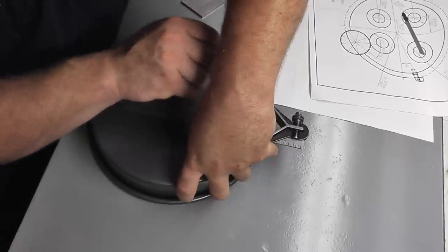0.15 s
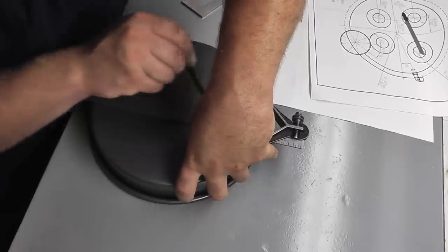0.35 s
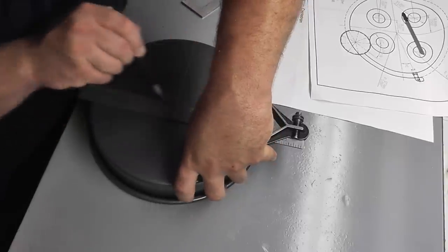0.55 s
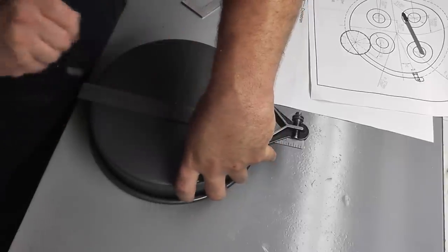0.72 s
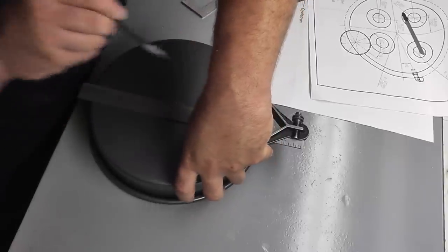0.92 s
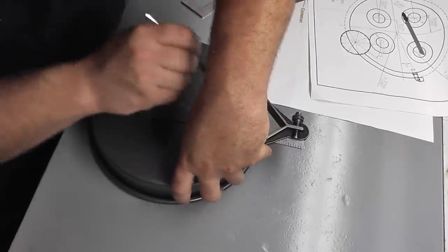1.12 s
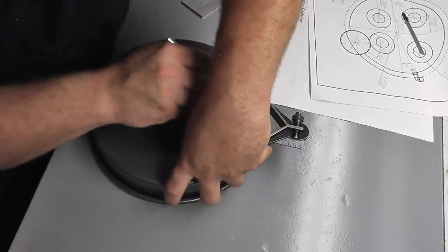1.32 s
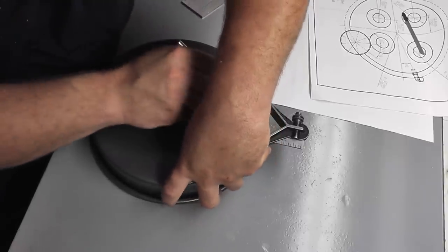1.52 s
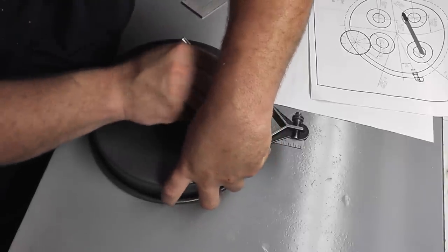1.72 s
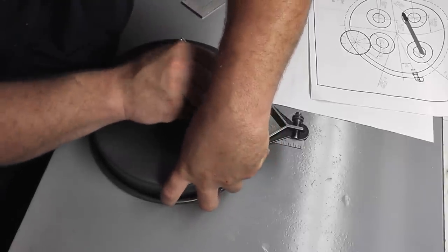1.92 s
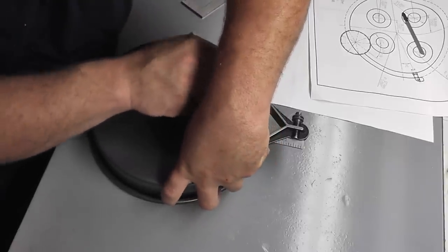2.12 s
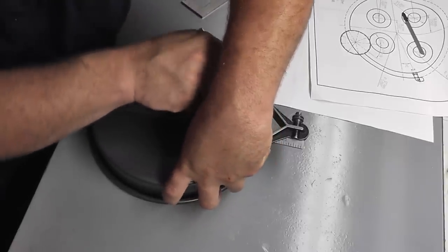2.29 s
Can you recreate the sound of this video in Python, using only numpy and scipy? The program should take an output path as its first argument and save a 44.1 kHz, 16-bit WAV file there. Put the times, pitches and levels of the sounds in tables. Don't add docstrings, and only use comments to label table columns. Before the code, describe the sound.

One long rising scratch of a steel scriber on a hollow pan, then a few taps

```python
import sys
import numpy as np
from scipy import signal
from scipy.fft import rfft, irfft, next_fast_len
from scipy.io import wavfile

SR = 44100
rng = np.random.default_rng(int(sys.argv[2]) if len(sys.argv) > 2 else 0)


def linear_from_db(decibels):
    return 10 ** (np.asarray(decibels, float) / 20)


def bounce(signal):
    frames = np.transpose(np.atleast_2d(signal))
    limited = np.clip(frames, -1, 1)
    pcm = np.round(limited * 32767).astype(np.int16)
    wavfile.write(sys.argv[1], SR, pcm)


N = 103635
LEAD = 11025
TOTAL = N + LEAD
TIME_S = (np.arange(TOTAL) - LEAD) / SR
BAND_EDGES_HZ = 35 * 2 ** np.arange(0, 9.1, 1 / 3)


def rms_one(x):
    return x / np.sqrt(np.mean(x ** 2) + 1e-20)


def at_hz(points, hz):
    table_hz, value = np.transpose(points)
    return np.interp(np.log(hz), np.log(table_hz), value)


def drift(hz):
    hop, settle = 40, 1000
    r = np.exp(-2 * np.pi * hz * hop / SR)
    noise = rng.standard_normal(TOTAL // hop + settle + 2)
    slow = signal.lfilter([1], [1, -2 * r, r * r], noise)[settle:]
    return np.interp(np.arange(TOTAL) / hop, np.arange(len(slow)), rms_one(slow))


def ring(x, hz, t60_s):
    r, w = linear_from_db(-60 / (t60_s * SR)), 2 * np.pi * hz / SR
    return signal.lfilter([0, np.sin(w)], [1, -2 * r * np.cos(w), r * r], x + 1e-18)


def bands(pair):
    for k, (low, high) in enumerate(zip(BAND_EDGES_HZ, BAND_EDGES_HZ[1:])):
        sos = signal.butter(2, [low, high], "band", fs=SR, output="sos")
        yield np.sqrt(low * high), signal.sosfilt(sos, pair[k % 2])


def stereo(mid, side, alike):
    return np.sqrt(1 + alike) * mid + np.sqrt(1 - alike) * side * [[1], [-1]]


# hz, level_db_per_hz
HUSH_SPECTRUM = [(30, -8.5), (120, 5), (210, 1.5), (600, -4.5), (1000, -14), (4600, -29), (6000, -23.5),
                 (15000, -33)]
# hz, correlation
HUSH_LIKENESS = [(40, -0.95), (90, 0.24), (250, 0.18), (1000, -0.62), (4000, 0.92), (15000, 0.54)]


def hush():
    level_db, waver_db, waver_hz = -52, 1.6, 19.0
    out = 0
    for hz, (mid, side) in bands(rng.standard_normal((2, 2, TOTAL))):
        alike = np.clip(at_hz(HUSH_LIKENESS, hz), -1, 1)
        gain = linear_from_db(at_hz(HUSH_SPECTRUM, hz) + waver_db * drift(waver_hz))
        out = out + gain * stereo(mid, side, alike)
    return linear_from_db(level_db) * rms_one(out[:, LEAD:])


# hz, t60_s
SHOP_T60 = [(100, 1.17), (700, 0.8968), (1500, 0.77), (6000, 0.65), (9000, .5), (13000, 0.43)]
# hz, wet_db
SHOP_WET = [(100, -5.5), (200, -8), (300, -11.5), (480, -9), (720, -1), (1400, -9), (6000, -10),
            (9000, -17.5), (13000, -16)]
# hz, lean_db
LEAN = [(60, -1), (250, 1), (600, .5), (2000, -.8), (4500, -1.5), (9000, .6)]


def workshop(x):
    onset_s, alike = 0.0037, 0.66
    bench_db, bench_s = -12, 0.004
    t, tail = np.arange(SR) / SR, 0
    for hz, (mid, side) in bands(rng.standard_normal((2, 2, SR))):
        t60_s = at_hz(SHOP_T60, hz)
        unit_energy = np.sqrt(6 * np.log(10) / t60_s / SR)
        fall = linear_from_db(at_hz(SHOP_WET, hz) - 60 * t / t60_s) * unit_energy * np.clip(t / onset_s, 0, 1)
        tail = tail + fall * stereo(mid, side, alike)
    bench = signal.lfilter([1, -1], [1, -.93], rng.standard_normal(SR) * np.exp(-t / bench_s))
    tail = tail + linear_from_db(bench_db) * bench / np.sqrt(np.sum(bench ** 2)) * [[1], [-1]]
    size = next_fast_len(len(x) + SR)
    hz = np.arange(size // 2 + 1) * SR / size + 1
    direct = linear_from_db(at_hz(LEAN, hz) * [[.5], [-.5]])
    return irfft(rfft(x, size) * (direct + rfft(tail, size)), size)[:, LEAD:LEAD + N]


# start_s, pitch_hz, peak_db, t60_s
RIM = [
    (.8, 818, -28.5, 0.075),
    (.808, 700, -19.5, 0.062),
    (.815, 121, -34.5, 0.077),
]


def rim():
    out = 0
    for start_s, pitch_hz, peak_db, t60_s in RIM:
        flick = np.zeros(TOTAL)
        flick[int(start_s * SR) + LEAD] = linear_from_db(peak_db)
        out = out + ring(flick, pitch_hz, t60_s)
    return out


# start_s, peak_db, tool_ring_rel_db, place_0_to_1, rattle_s
TAPS = [(0.806, -22, -15, 1, 0.0086), (0.812, -25, -11, 0.62, 0.0029), (1.616, -20.5, -18, 0.48, 0.0025),
        (1.684, -41, -15.5, .5, 0.0027), (1.725, -47, -9, 0.6, 0.0032), (1.743, -40, -9, .5, 0.0047),
        (1.775, -24, -12, 1, 0.0041), (1.798, -28, -23, 1, 0.0028), (1.847, -44.5, -6, .6, 0.0027),
        (1.943, -41, -20, 0.44, 0.0035), (2.063, -40, -8.5, 0.38, .01)]


def tap_rattles(levels_db):
    out = []
    for (start_s, _, _, _, rattle_s), db in zip(TAPS, levels_db):
        decay = np.exp(-np.maximum(TIME_S - start_s, 0) / rattle_s)
        out.append(linear_from_db(db) * (TIME_S >= start_s) * decay)
    return out


# time_s, bite_db, hiss_db
STROKE = [(0.145, -43, -62), (0.163, -36, -49), (0.199, -33, -39), (0.25, -33.5, -43), (0.275, -31, -46),
          (0.35, -30, -40), (0.441, -25.5, -31), (0.52, -26.5, -33.5), (0.58, -20, -30.5),
          (0.639, -17.5, -33), (0.68, -20, -25.5), (0.719, -24.5, -24), (0.761, -25, -21.5),
          (0.795, -28, -22), (0.823, -29, -24.5)]
# time_s, bite_db, hiss_db
SHUFFLE = [(1.62, -40, -64), (1.66, -48, -71), (1.69, -44.5, -77), (1.718, -55, -81), (1.742, -37, -60),
           (1.775, -35.5, -55), (1.81, -41, -67), (1.868, -52, -61), (1.883, -55, -83), (1.93, -65, -75),
           (1.961, -62, -64)]
# start_s, length_s, bite_db, hiss_db
BRUSHES = [
    (1.1, 0.3, -58.5, -65),
    (-.2, 0.13, -39.5, -46.5),
]


def contact():
    lift_s = 0.0033
    brushes = [[(s, bite, hiss), (s + length, bite, hiss)] for s, length, bite, hiss in BRUSHES]
    out = 0
    for rows in [STROKE, SHUFFLE] + brushes:
        s, bite_db, hiss_db = np.transpose(rows)
        on = np.clip(np.minimum(TIME_S - s[0], s[-1] - TIME_S) / lift_s + 1, 0, 1)
        out = out + on * linear_from_db([np.interp(TIME_S, s, bite_db), np.interp(TIME_S, s, hiss_db)])
    return out


def grains():
    rate_per_s, spread_db = 12000, 1.21
    stutter_db, stutter_hz = 2, 24.7
    sign_draw, slip_draw = rng.random((2, TOTAL))
    sizes = linear_from_db(spread_db * rng.exponential(1, TOTAL)) * np.sign(sign_draw - .5)
    slips = sizes * (slip_draw < rate_per_s / SR)
    return rms_one(slips * linear_from_db(stutter_db * drift(stutter_hz)))


# hz, level_db_per_hz
SCRATCH = [(120, -19.5), (200, 0), (900, -11.5), (2150, -16), (3000, -10), (4700, -20.5), (6000, -9),
           (9000, -12), (12500, -24), (15500, -34)]


def scratch(low_hz, high_hz):
    size = next_fast_len(TOTAL)
    hz = np.arange(size // 2 + 1) * SR / size + 1
    keep = (hz >= low_hz) & (hz < high_hz)
    return rms_one(irfft(rfft(grains(), size) * linear_from_db(at_hz(SCRATCH, hz)) * keep, size)[:TOTAL])


def rub_and_crack(bite, hiss):
    scratch_db, middle_db, high_db = -8.5, -8.5, 1.5
    crack_middle_db, crack_high_db = -12, -6.5
    low, middle, high = scratch(60, 2000), scratch(2000, 4600), scratch(4600, 16000)
    _, peak_db, tool_db, _, _ = np.transpose(TAPS)
    crack = sum(tap_rattles(peak_db + tool_db))
    crack = crack * (linear_from_db(crack_middle_db) * middle + linear_from_db(crack_high_db) * high)
    rub = bite * low + linear_from_db(middle_db) * np.sqrt(bite * hiss) * middle + linear_from_db(high_db) * hiss * high
    return crack + linear_from_db(scratch_db) * rub


def couple(place, antinode, width, off_db):
    return linear_from_db(off_db * (1 - np.exp(-((place - antinode) / width) ** 2)))


def body(modes, t60_s, drive, taps_db, spots, rest, off_db, wander_db, wander_hz):
    first_s, last_s = STROKE[0][0], STROKE[-1][0]
    stroking = (TIME_S > first_s - .1) & (TIME_S < last_s + .1)
    place = np.where(stroking, (TIME_S - first_s) / (last_s - first_s), rest)
    slips, rattles = grains(), tap_rattles(taps_db)
    norm = np.sqrt(np.sum(linear_from_db(np.array(modes)[:, 1]) ** 2))
    out = 0
    for k, (hz, db, antinode, width) in enumerate(modes):
        steady = np.sqrt(np.mean(ring(slips, hz, t60_s) ** 2))
        gain = drive * couple(place, antinode, width, off_db) * linear_from_db(wander_db * drift(wander_hz))
        for rattle, spot in zip(rattles, spots):
            gain = gain + rattle * couple(spot, antinode, width, off_db)
        out = out + (-1) ** k * linear_from_db(db) * ring(slips * gain / steady / norm, hz, t60_s)
    return out


# pitch_hz, level_db, antinode_0_to_1, width_0_to_1
STEEL = [(2668, -4.5, 0.51, 0.22), (3130, -3.5, 0.49, 0.22), (3710, -10, 0.57, 0.44),
         (3990, -7, 0.45, 0.43), (5445, -0.5, 0.4, 0.52), (5860, -0.5, 0.69, 0.16), (6063, 0, 0.62, 0.66),
         (6460, -1, 0.25, 0.39), (7300, -7.5, 0.2, 0.56), (8190, 1, 0.89, 0.07), (8440, 5.5, 0.84, 0.068),
         (8830, 6, 0.89, 0.049), (9110, -1, 0.68, 0.38), (10070, -5, 1, 0.096)]


def steel(hiss):
    held_at, level_db = 0.12, 3
    _, peak_db, tool_db, spots, _ = np.transpose(TAPS)
    out = body(STEEL, .012, hiss, peak_db + tool_db, 0 * spots + held_at, held_at,
               off_db=-14.5, wander_db=2, wander_hz=14)
    sos = signal.butter(2, [1800, 10400], "band", fs=SR, output="sos")
    return linear_from_db(level_db) * signal.sosfilt(sos, out)


# pitch_hz, level_db, antinode_0_to_1, width_0_to_1
PAN = [(202.1, 1, 0.52, 0.28), (225, 2.5, 0.22, 0.46), (301, -7.5, 0.67, 0.18), (332.5, -2, 0.79, 0.12),
       (417, -2.5, 0.66, 0.31), (477.5, 3, 0.6, 0.16), (584.6, -5, 0.83, 0.74), (651.6, -2, 0.55, 0.78),
       (711.4, 0, 0.98, 0.084), (830.3, -7, 0.88, 0.77), (1148, -11, 0.73, 0.37), (1239, -2, 0.75, 0.09),
       (1516, -4, 0.81, 0.16), (1725, -13.5, 0.46, 0.16)]


def pan(bite):
    tap_db, soft_hz, low_hz, set_down_at = 3.5, 2540, 158, 0.715
    _, peak_db, _, spots, _ = np.transpose(TAPS)
    out = body(PAN, .07, bite, peak_db + tap_db, spots, set_down_at,
               off_db=-8, wander_db=3, wander_hz=10.9)
    soft = np.exp(-2 * np.pi * soft_hz / SR)
    out = signal.lfilter([1 - soft], [1, -soft], out)
    return signal.sosfilt(signal.butter(4, low_hz, "high", fs=SR, output="sos"), out)


def scriber():
    bite, hiss = contact()
    return pan(bite) + steel(hiss) + rub_and_crack(bite, hiss) + rim()


def scene():
    return workshop(scriber()) + hush()


def band_limit(x):
    return signal.sosfilt(signal.butter(12, 15760, fs=SR, output="sos"), x)


def record(dry):
    return band_limit(dry)


dry = scene()
out = record(dry)
bounce(out)
```